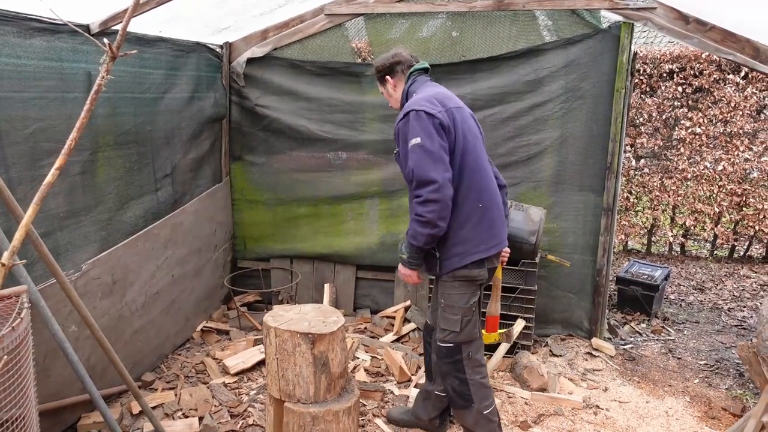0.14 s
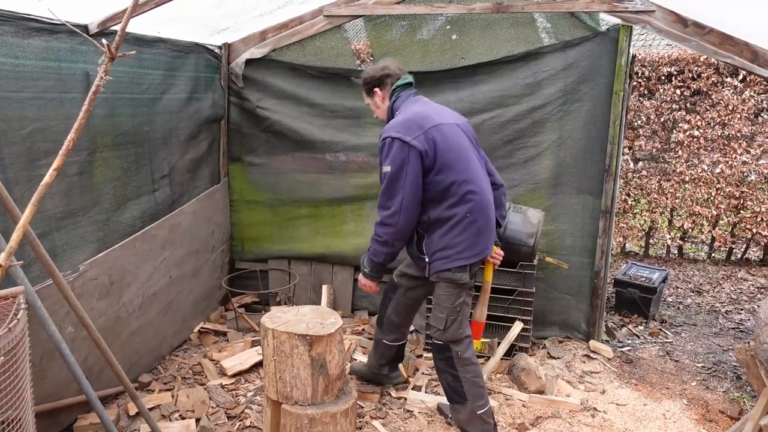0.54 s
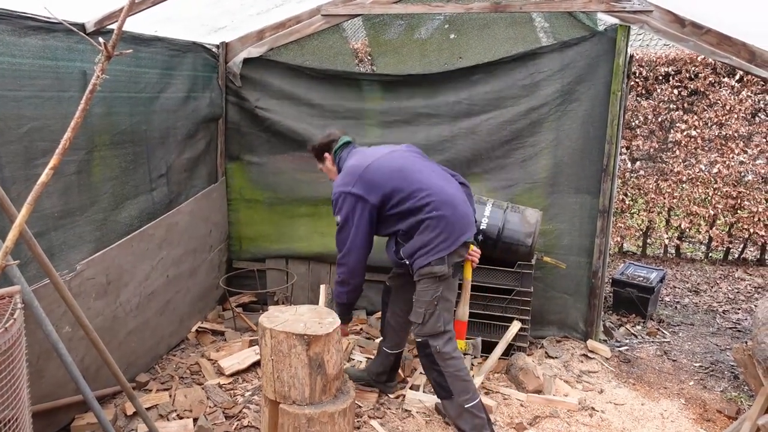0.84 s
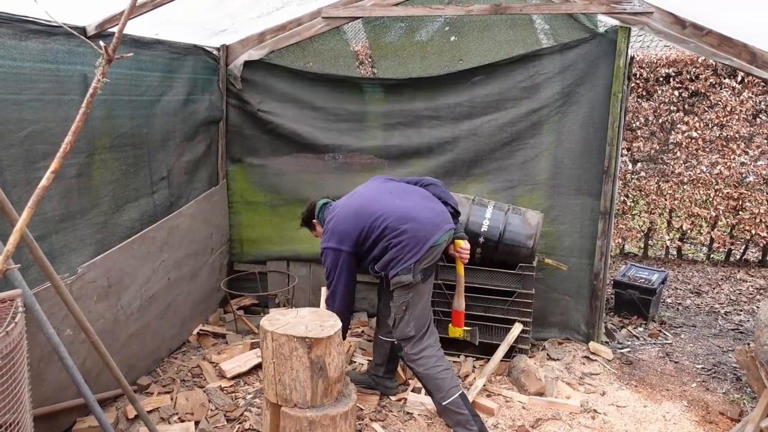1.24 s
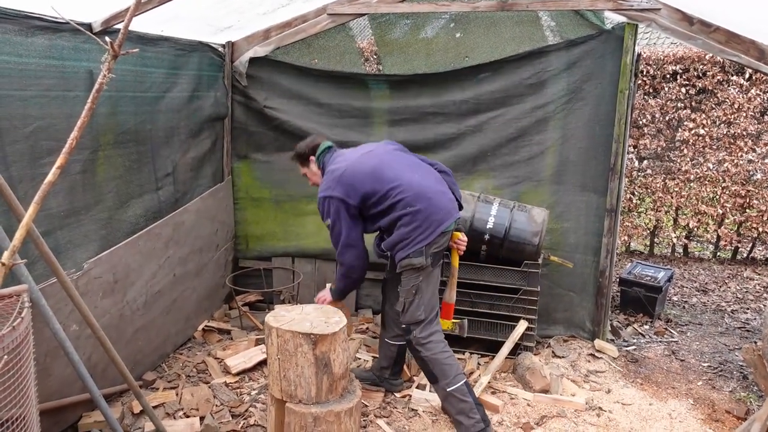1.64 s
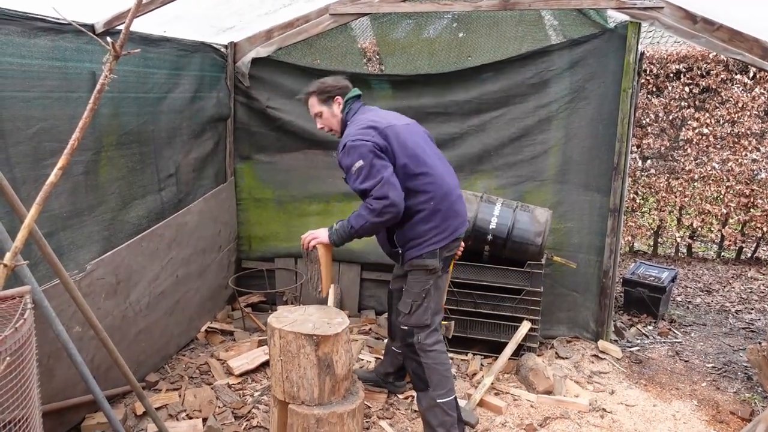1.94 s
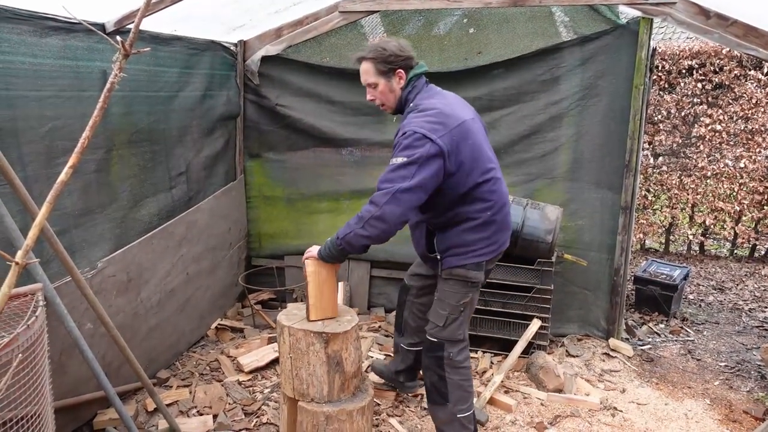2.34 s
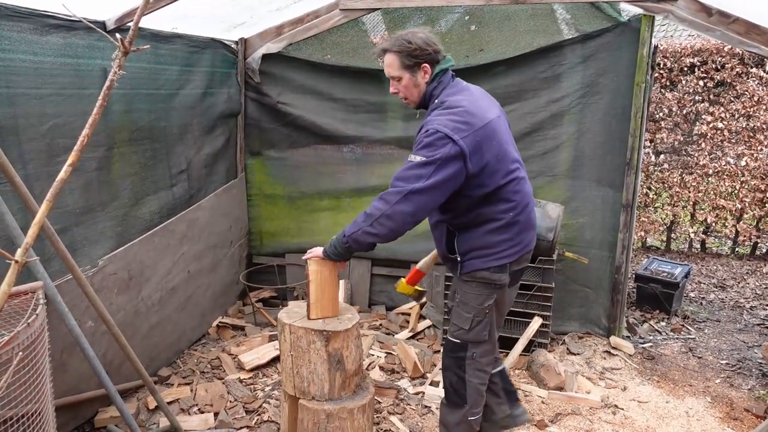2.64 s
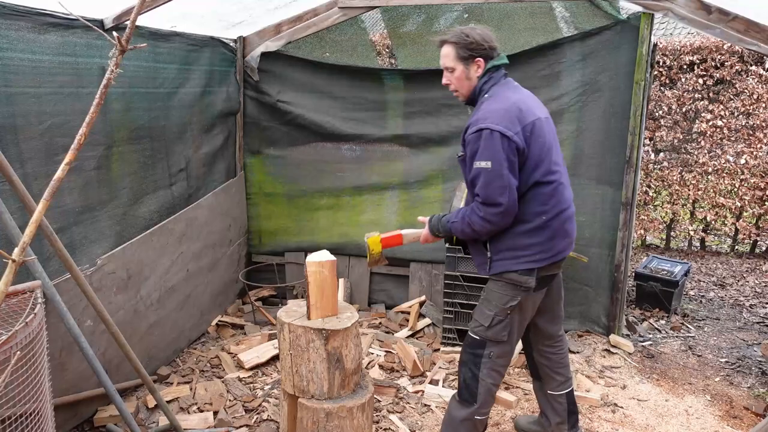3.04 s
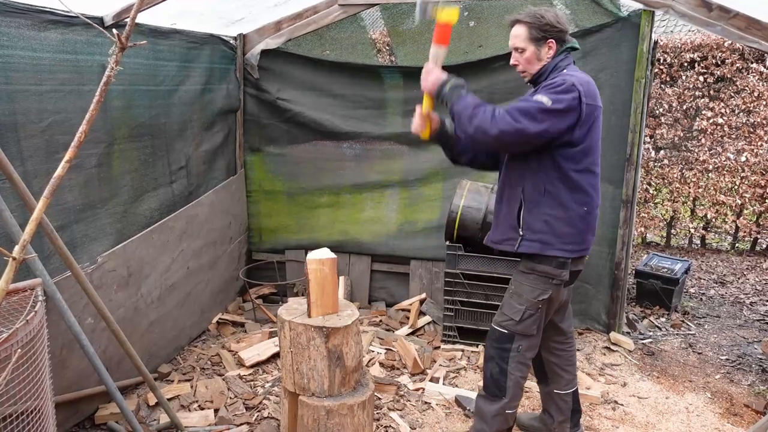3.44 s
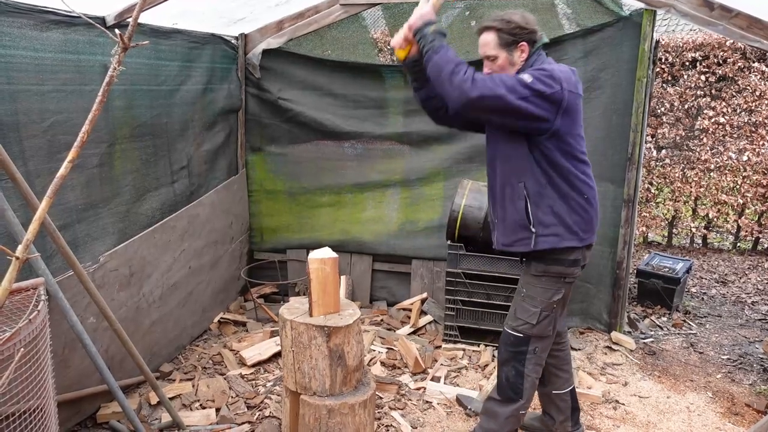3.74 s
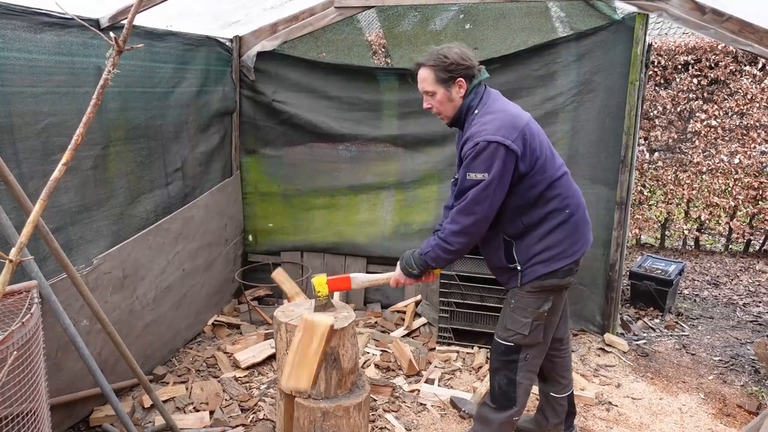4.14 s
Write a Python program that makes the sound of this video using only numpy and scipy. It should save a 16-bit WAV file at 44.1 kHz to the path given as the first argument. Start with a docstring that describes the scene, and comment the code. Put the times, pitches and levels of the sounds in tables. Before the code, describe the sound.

Boots scuff and crunch on wood chips under an open shelter, with small snaps and clicks. After a quieter rustling spell, a log lands on a block with a double hollow knock. A brief cloth rub follows, then one huge axe crack with splintering and a short low rumble. Faint bird chirps and soft outdoor air lie behind; close microphone, slight wind rumble, blow overloading.

```python
"""Splitting a log on wood chips

Someone shuffles on wood chips under an open shelter, stands a log on a block and splits it with one axe blow.
Shaped grains make the crunch and rustle, ringing sines the wood knocks, struck modes and crackle the splitting log.
A small bird chirps far off in gliding tones; a thin whistle passes as a narrow band of noise.
Soft air and a light wind rumbling on the microphone lie beneath; the blow clips at full scale."""
import sys
import numpy as np
from scipy import signal
from scipy.fft import rfft, irfft
from scipy.io import wavfile

SR = 44100
rng = np.random.default_rng(int(sys.argv[2]) if len(sys.argv) > 2 else 0)


def unload_wav(signal):
    """Save mono or channel-first audio to the path in sys.argv[1] as 16-bit WAV at rate SR, clipped to [-1, 1]."""
    wavfile.write(
        sys.argv[1],
        SR,
        np.round(np.clip(np.atleast_2d(signal).T, -1, 1) * 32767).astype(np.int16),
    )


N = 189277
TINY = 1e-18   # inaudible offset that keeps decaying filters from slowing down


def from_db(db):
    """Decibels to gain."""
    return 10 ** (np.asarray(db) / 20)


def rms_one(x):
    """Scale to unit rms."""
    return x / np.sqrt(np.mean(x ** 2) + 1e-20)


def in_time(rows):
    """Columns of a breakpoint curve, one value per sample."""
    s, *columns = np.transpose(rows)
    return [np.interp(np.arange(N) / SR, s, column) for column in columns]


def to_samples(s):
    """Seconds to the nearest sample."""
    return np.round(s * SR).astype(int)


def band(x, low_hz, high_hz, order=2):
    """Band-pass."""
    return signal.sosfilt(signal.butter(order, [low_hz, high_hz], "band", fs=SR, output="sos"), x)


def split(x, edges_hz):
    """Cut a noise into neighbouring bands that overlap smoothly; each rms 1."""
    grid, spectrum = np.fft.rfftfreq(N, 1 / SR), rfft(x)
    below = [0] + [1 / (1 + (grid / hz) ** 4) for hz in edges_hz] + [1]
    return [rms_one(irfft(spectrum * np.sqrt(upper - lower), N)) for lower, upper in zip(below, below[1:])]


def coloured(x, spectrum):
    """Shape a source with a spectrum in relative dB per Hz; rms 1."""
    hz, db = np.transpose(spectrum)
    grid = np.maximum(np.fft.rfftfreq(N, 1 / SR), 1)
    gain = from_db(np.interp(np.log(grid), np.log(hz), db))
    return rms_one(irfft(rfft(x) * gain, N))


def ring(clicks, hz, t60):
    """A two-pole resonator: a unit click sets a sine of height 1 ringing, 60 dB down after t60 seconds."""
    radius, angle = from_db(-60 / (t60 * SR)), 2 * np.pi * hz / SR
    return signal.lfilter([0, np.sin(angle)], [1, -2 * radius * np.cos(angle), radius ** 2], clicks + TINY)


def grains(per_s, spread_db, smooth):
    """Random clicks of uneven size on a share of smooth noise."""
    sizes = from_db(spread_db * np.minimum(rng.exponential(1, N), 4))
    signed = sizes * rng.choice([-1, 1], N)
    clicks = signed * (rng.random(N) < per_s / SR)
    return rms_one(clicks) + smooth * rng.standard_normal(N)


def puff(at, db, t60, low_hz, high_hz):
    """Noise bursts that die away after each click."""
    clicks = np.zeros(N)
    clicks[at] = from_db(db)
    envelope = signal.lfilter([1], [1, -from_db(-60 / (t60 * SR))], clicks + TINY)
    return envelope * rms_one(band(rng.standard_normal(N), low_hz, high_hz, order=1))


# tone of the open air: pitch_hz, relative level_db (per Hz)
AIR_SPECTRUM = [(40, -1), (76, -6), (140, -10.5), (250, -11.5), (500, -20.5), (1000, -22.5), (2000, -26),
                (4000, -37.5), (8500, -51.5), (10000, -52), (13500, -45), (15800, -65)]
AIR_DB = -49


def air():
    """Steady noise, darker towards the treble."""
    return from_db(AIR_DB) * coloured(rng.standard_normal(N), AIR_SPECTRUM)


# light gusts on the microphone: time_s, rumble_db
GUSTS = [(0.0, -35.5), (0.15, -41), (0.23, -50.5), (0.68, -41), (0.73, -49), (1.03, -39.5), (1.21, -44.5),
         (1.52, -28.5), (1.55, -38), (1.93, -30), (1.99, -37.5), (2.15, -35.5), (2.2, -43), (2.44, -37),
         (2.47, -41.5), (3.01, -36.5), (3.05, -41), (4.29, -37.5)]


def wind():
    """Gusts sway the microphone membrane in a slow wavering swing."""
    noise = rng.standard_normal(N + SR)
    swing = signal.hilbert(band(noise, 13.4, 24.9, order=3)[SR:])   # the filter settles for one second
    evened = swing.real / (np.abs(swing) + 0.49 * np.std(swing.real))   # peaks held back
    gust_db, = in_time(GUSTS)
    return from_db(gust_db) * rms_one(band(evened, 5.2, 62.0))


# thin high tone: pitch_hz, width_hz, level_db
WHISTLE_TONE = (8360, 380, -60)
# when it hangs in the air: start_s, length_s
WHISTLE_SPAN = (.1, .47)


def whistle():
    """A narrow band of noise that swells and fades."""
    hz, width_hz, db = WHISTLE_TONE
    start_s, length_s = WHISTLE_SPAN
    arch = np.sin(np.pi * np.clip((np.arange(N) / SR - start_s) / length_s, 0, 1))
    return from_db(db) * arch * rms_one(band(rng.standard_normal(N), hz - width_hz / 2, hz + width_hz / 2))


SHELTER_T60_S, TARP_CUT_HZ, SHELTER_DB = 0.17, 2600, -24.5


def shelter(x):
    """Eight feedback delays between boards and tarps, duller on every round."""
    out, dull = np.zeros(N), np.exp(-2 * np.pi * TARP_CUT_HZ / SR)
    lags = (rng.uniform(.008, .028, 8) * SR).astype(int)
    for k, lag in enumerate(lags):
        loop, gain, state = x.copy(), from_db(-60 * lag / SR / SHELTER_T60_S), [0.]
        for i in range(lag, N, lag):
            back, state = signal.lfilter([gain * (1 - dull)], [1, -dull], loop[i - lag:i], zi=state)
            loop[i:i + lag] += back[:N - i]
        out += (loop - x) * (-1) ** k   # echoes only, alternating sign
    return out


# far chirps: start_s, length_s, first_pitch_hz, settled_pitch_hz (before the slow rise),
# level_db (at the start, before flutter)
CHIRPS = [(.525, .085, 4700, 3150, -61.5), (0.819, 0.12, 4590, 2957, -55), (.97, 0.066, 3080, 3080, -60),
          (2.09, 0.07, 2510, 3900, -56.5), (2.17, 0.06, 3210, 3020, -51.5), (2.716, .06, 3680, 2550, -58),
          (2.909, 0.21, 4890, 2950, -53), (3.155, 0.123, 5190, 2940, -55), (4.15, 0.14, 3990, 2957, -55.5)]
GLIDE_S, RISE_HZ_PER_S = .024, 1800
CHIRP_ATTACK_S, CHIRP_RELEASE_S, CHIRP_FADE_DB_PER_S = .01, 0.021, 40
BIRD_ECHO_DB = -4


def bird():
    """Hoarse two-strand chirps glide to a slowly rising pitch, broken by a flutter and blurred by echoes."""
    out, t = np.zeros(N), np.arange(N) / SR
    white = rng.standard_normal((3, N))
    hoarse = [rms_one(signal.lfilter([1], [1, -.982], w)) for w in white[:2]]
    flutter = from_db(3 * rms_one(band(white[2], 20, 70, order=1)))
    for start_s, length_s, first_hz, settled_hz, db in CHIRPS:
        age = np.maximum(t - start_s, 0)
        glide_hz = (first_hz - settled_hz) * np.exp(-age / GLIDE_S)
        hz = settled_hz + glide_hz + RISE_HZ_PER_S * np.minimum(age, length_s)
        phase = 2 * np.pi * np.cumsum(hz) / SR
        fade = np.clip(np.minimum(age / CHIRP_ATTACK_S, (length_s - age) / CHIRP_RELEASE_S), 0, 1)
        level = from_db(db - CHIRP_FADE_DB_PER_S * age)
        strands = (1.1 + hoarse[0]) * np.sin(phase) + .65 * hoarse[1] * np.sin(1.12 * phase)
        out += fade * level * flutter * strands
    return out + from_db(BIRD_ECHO_DB) * shelter(out + TINY)


def chips(per_s, spread_db, cycles):
    """Random contacts, each ringing a few cycles in a chip of its own size."""
    contacts, dealt = grains(per_s, spread_db, smooth=0), rng.integers(0, 16, N)
    out = np.zeros(N)
    for k, hz in enumerate(np.geomspace(350, 2300, 16)):
        ringing = ring(contacts * (dealt == k), hz, cycles / hz)
        out += rms_one(ringing) * np.sqrt(hz / 1000)   # higher chips sound louder
    return out


# tone of chips and cloth before band levels: pitch_hz, relative level_db (per Hz)
RUSTLE_SPECTRUM = [(88, -66), (150, 10.5), (656, 4.5), (751, 1.5), (827, 3), (1020, 2), (1400, -0.5),
                   (3620, -11), (8330, -19), (10800, -27.5), (13300, -25), (15500, -27)]
# boots scuff the chips, sleeves rub: loudest_s, swell_s, fade_s, rub_db (before the trim),
# then relative to the rub: crunch_db, scratch_db, hiss_db
SCUFF_EVENTS = [(.22, 0.028, 0.022, -43.5, 5.5, -25, -3), (.27, .25, .6, -57, 7, -2, 10),
                (.285, .015, 0.18, -51.5, 7.5, -20, -3), (.598, 0.0087, 0.052, -41.5, -2, -3, -9),
                (.64, 0.04, 0.11, -46.5, 5, 2.5, -1), (.666, .012, 0.065, -42, 4, 4, -0.5),
                (0.698, 0.015, 0.038, -34, 2, 4.5, -11), (.75, 0.041, 0.027, -44, 4, -11, -2),
                (0.801, 0.017, 0.056, -55.5, 15.5, -15, 13), (1.135, 0.057, 0.19, -47, -4, -7.5, -3),
                (1.368, 0.016, 0.037, -47, 15.5, -4, -3.5), (1.462, 0.015, 0.081, -58.5, -11, 13, -1),
                (1.902, 0.017, 0.095, -31.5, -10, -4.5, -18), (2.12, 0.28, 0.18, -46.5, -16, -6, -30),
                (2.163, 0.013, 0.05, -49.5, 8, -13, 12), (2.309, 0.012, 0.037, -43.5, 3, 2.5, 3),
                (2.28, .02, 0.075, -54.5, 1.5, 7, 4), (2.46, 0.058, 0.15, -57, 8, -15, -15),
                (2.56, 0.04, 0.053, -57, 15, -19, -2), (2.87, 0.05, 0.15, -52, 6, -6, -4.5),
                (2.94, 0.024, 0.026, -45, -5, -0.5, -14), (3.09, .1, 0.14, -59, 2, -15, 3.5),
                (3.2, 0.01, .1, -46, -10, -15, -22), (3.228, .03, 0.18, -35, -11, -11, -33),
                (3.345, 0.28, 0.24, -36.5, -20, -3, -20), (3.6, 0.21, 0.16, -57.5, -2, -15, 2),
                (4.218, .01, 0.11, -42.5, -2.5, -19, -27), (3.9, 0.027, 0.25, -52, 5, -2, -11)]
# faint rustle that never stops, before its changes and the trim: rub_db, crunch_db, scratch_db, hiss_db
STIRRING_LEVELS = (-63.5, -55.5, -78.5, -61)
# how the faint rustle comes and goes, and how airy all rubbing sounds:
# time_s, rustle_change_db, airy_db (above 10.5 kHz, relative to the hiss)
RUSTLE_MOTION = [(0, 5.5, -8), (.5, -1.5, -6), (.9, 7.5, -16), (1.3, 3, -6), (1.75, 1, -0.5),
                 (1.9, -2.5, 1.5), (2.3, 1, -1.5), (2.5, 0, -4), (3.0, -3, -6), (3.3, -12, -4),
                 (3.63, -8, -5), (3.67, -10.5, -19), (3.87, -1.5, -14.5), (3.9, -2, -8), (4.29, -2, -1)]
SWELL_DB = 20   # a scuff gains this much over its swell and loses it over its fade
SHUFFLE_TRIM_DB = -6.5


def shuffle():
    """Dense grains under boots and sleeves; every scuff swells and fades, dull or hissy in its own way."""
    t = np.arange(N) / SR
    rustle_db, airy_db = in_time(RUSTLE_MOTION)
    # powers of rub, crunch, scratch and hiss add up over all scuffs
    power = from_db(np.add.outer(STIRRING_LEVELS, rustle_db)) ** 2
    power[1] = from_db(STIRRING_LEVELS[1] + 0.32 * rustle_db) ** 2   # the low crunch changes less
    for loudest_s, swell_s, fade_s, rub_db, *above_db in SCUFF_EVENTS:
        before = (loudest_s - t) / max(swell_s, .005)
        after = (t - loudest_s) / max(fade_s, .005)
        shape_db = -SWELL_DB * np.maximum(before, after)
        band_db = rub_db + np.array([0, *above_db])
        power = power + from_db(2 * shape_db) * from_db(band_db)[:, None] ** 2
    source = rms_one(grains(3500, 2.8, smooth=1.1)) + .075 * chips(1300, 2.6, cycles=30)
    crunch, rub, scratch, hiss, airy = split(coloured(source, RUSTLE_SPECTRUM), edges_hz=[850, 2400, 6000, 10500])
    layers = [rub, crunch, scratch, hiss + from_db(airy_db) * airy]
    return from_db(SHUFFLE_TRIM_DB) * np.sum(np.sqrt(power) * layers, axis=0)


# weight lands on the ground: time_s, push_db (before the band-pass)
HEEL_STEPS = [(0.279, -41), (.594, -26), (0.867, -33.5), (1.366, -34.5), (2.155, -36), (2.228, -35)]


def heels():
    """Each step pushes a short damped low ring: a dull thud in the ground."""
    s, db = np.transpose(HEEL_STEPS)
    push = np.zeros(N)
    push[to_samples(s)] = from_db(db)
    return band(ring(push, 154, t60=0.035), 90, 300, order=1)


# chips snapping and wood knocking: time_s, strike_db (before the trims), pitch_hz,
# then relative to the strike: clatter_db (before its trim), crisp_db
WOOD_KNOCKS = [(.219, -31.5, 295, -15, -20), (.279, -29, 700, -2.5, -28), (.594, -28, 267, -5, -27),
               (.633, -34.5, 1250, -3, -14), (.662, -25.5, 1090, -1, -27), (.6945, -21, 1890, -2, -31),
               (.726, -30, 630, -11, -10), (.747, -31, 387, -4, -28), (0.749, -35.5, 1040, -4, -23),
               (0.796, -42, 331, -14, -2), (.797, -34.5, 610, -15, 4.5), (0.865, -35.5, 820, 1, -15),
               (.929, -46, 980, -10, -5), (1.131, -35.5, 1430, 9, -1.5), (1.229, -47, 1020, -12, 2),
               (1.367, -28, 408, -10, -22), (1.452, -47, 522, -5, -7), (1.758, -45, 1510, -9, -5),
               (1.893, -34, 674, -4, -24), (2.079, -37.5, 1150, -11, -24), (2.155, -18.5, 286, -5.5, -8.5),
               (2.226, -22, 398, -14, -32), (2.273, -36.5, 286, 7.5, -20), (2.3, -32.5, 2250, 11, -8),
               (2.313, -37, 1470, 3, -9), (2.46, -41, 396, -9, -25), (2.69, -43.5, 2070, 5.5, -20),
               (2.817, -45, 1100, 3, -20), (2.933, -41, 1110, -9, -15), (3.22, -38, 1150, -12, -28),
               (3.27, -23, 827, -12, -32), (3.893, -43, 388, 9.5, -29), (4.18, -45, 900, -9, 0),
               (4.195, -39, 1300, -5, -25), (4.213, -31.5, 1005, -2, -29), (4.242, -28, 782, -18, -30)]
KNOCK_T60_S, DEEP_RINGS_LONGER = 0.042, 0.3   # at 700 Hz; power of the pitch ratio
CLATTER_TRIM_DB, KNOCK_TRIM_DB = -10, -2.5


def knocks():
    """Each piece rings at its own pitch under a short clatter and a crisp tick."""
    s, strike_db, _, clatter_db, crisp_db = np.transpose(WOOD_KNOCKS)
    at = to_samples(s)
    out = puff(at, strike_db + crisp_db, t60=0.012, low_hz=3500, high_hz=9500)
    out += puff(at, strike_db + clatter_db + CLATTER_TRIM_DB, t60=0.021, low_hz=800, high_hz=3900)
    age = np.arange(SR // 5) / SR
    for i, (_, db, hz, *_) in zip(at, WOOD_KNOCKS):
        rise = 1 - np.exp(-age * hz)   # the contact lasts about one cycle
        t60 = KNOCK_T60_S * (700 / hz) ** DEEP_RINGS_LONGER
        level = from_db(db + KNOCK_TRIM_DB - 60 * age / t60)
        out[i:i + len(age)] += (rise * np.sin(2 * np.pi * hz * age) * level)[:N - i]
    return out


# the block shakes the ground just after the blow: start_s, rumble_db (before swell and decay),
# low_hz, high_hz, t60_s
GROUND_THUMP = (4.0, -25, 34, 150, 0.5)


def thump():
    """A low rumble of band-passed noise that swells and dies."""
    start_s, db, low_hz, high_hz, t60 = GROUND_THUMP
    age = np.maximum(np.arange(N) / SR - start_s, 0)
    rumble = rms_one(band(rng.standard_normal(N), low_hz, high_hz))
    swell = 1 - np.exp(-age / 0.03)
    return from_db(db - 60 * age / t60) * swell * rumble


# axe blow, then the strongest pulses of the splitting and ringing log:
# time_s, strike_db (before the trim), crisp_db (relative to the strike)
SPLIT_PULSES = [(3.9832, 7, -20.5), (3.989, -14, -27), (4.0028, -4.5, -16.5), (4.008, -1, -35),
                (4.0118, -6, -33), (4.0150, 1, -41), (4.0175, -2.5, -46), (4.0242, -11, -38),
                (4.0258, -9.5, -39), (4.0406, -9, -30), (4.051, -12.5, -15), (4.061, -15.5, -15),
                (4.075, -14, -34), (4.0976, -21.5, -4.5), (4.102, -16, -18), (4.12, -22, -21),
                (4.134, -26, -20), (4.165, -32, -21)]
# ringing modes of the log: pitch_hz, level_db (relative to the strike, before the trim), t60_s
LOG_MODES = [(295, -9, 0.075), (387, -5, 0.075), (538, -7, 0.071), (674, 3.5, 0.025), (795, 3.5, 0.028),
             (990, 4, 0.036), (1150, -1.5, 0.033), (1480, -27, 0.025), (1782, -9, 0.062), (2100, -21, .015),
             (2945, -7, 0.04)]
# fibres tearing and the halves tumbling: time_s, level_db (before the trim), treble_db (relative to the level)
TEARING_CURVE = [(3.984, 4.5, -26), (3.994, -10, -5), (4.016, -6, -24), (4.03, -12, -17.5),
                 (4.108, -22.5, -12.5), (4.15, -36, -13.5), (4.29, -42.5, -28)]
# tone of torn wood before band levels: pitch_hz, relative level_db (per Hz)
TORN_SPECTRUM = [(35, -36), (60, -15), (163, -26), (376, 4), (475, -9), (756, 11), (910, 5), (976, 7.5),
                 (3500, -13), (8470, -19), (15500, -37)]
MODE_TRIM_DB, MODE_SPREAD_DB, TEARING_TRIM_DB = -13.5, 3.65, -8.0


def chop():
    """Every pulse strikes the modes of the log unevenly; torn fibres crackle between them."""
    s, strike_db, crisp_db = np.transpose(SPLIT_PULSES)
    at = to_samples(s)
    modes = np.zeros(N)
    uneven_db = rng.normal(0, MODE_SPREAD_DB, (len(at), len(LOG_MODES)))
    for (hz, db, t60), own_db in zip(LOG_MODES, uneven_db.T):
        clicks = np.zeros(N)
        clicks[at] = from_db(strike_db + db + MODE_TRIM_DB + own_db)
        modes += ring(clicks, hz, t60)
    body = band(modes, 288, 2670, order=3)   # keeps the ringing of the log clear of low thud
    level_db, treble_db = in_time(TEARING_CURVE)
    low, high = split(coloured(grains(6000, 2.4, smooth=0.81), TORN_SPECTRUM), edges_hz=[3000])
    after_blow = np.arange(N) >= at[0]
    tearing = after_blow * from_db(level_db + TEARING_TRIM_DB) * (low + from_db(treble_db) * high)
    crisp = puff(at, strike_db + crisp_db, t60=0.02, low_hz=3000, high_hz=7800)
    return body + tearing + crisp


def scene():
    """Contacts in the shelter over bird, whistle, air and wind."""
    background = air() + wind() + whistle() + bird()
    hits = heels() + knocks() + chop() + TINY
    sheltered = hits + from_db(SHELTER_DB) * shelter(hits)
    return (background + shuffle() + thump() + sheltered)[None]


FULL_SCALE, CUTOFF_HZ = 1.0, 15900


def record(dry):
    """Peaks clip at full scale, then a steep low-pass cuts the top."""
    clipped = np.clip(dry, -FULL_SCALE, FULL_SCALE)
    return signal.sosfilt(signal.cheby2(20, 60, CUTOFF_HZ, fs=SR, output="sos"), clipped)


dry = scene()
out = record(dry)
unload_wav(out)
```